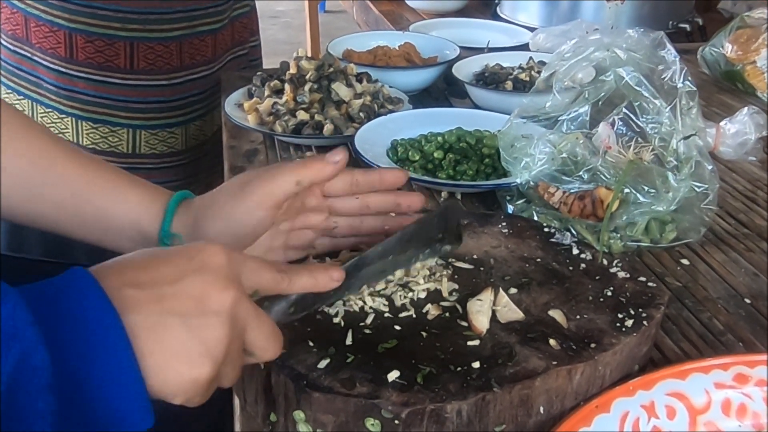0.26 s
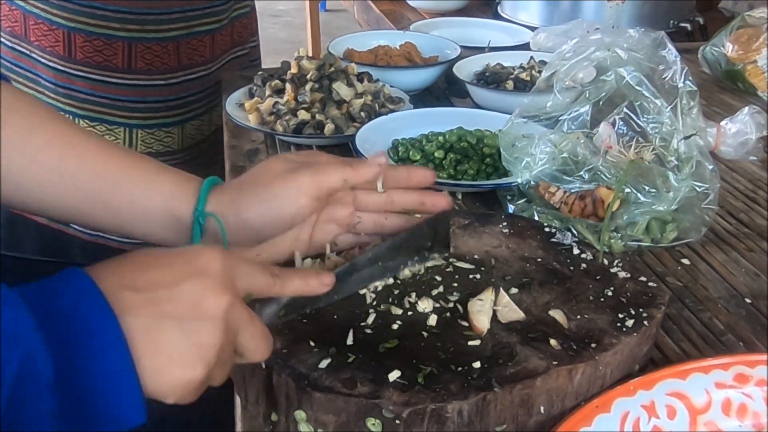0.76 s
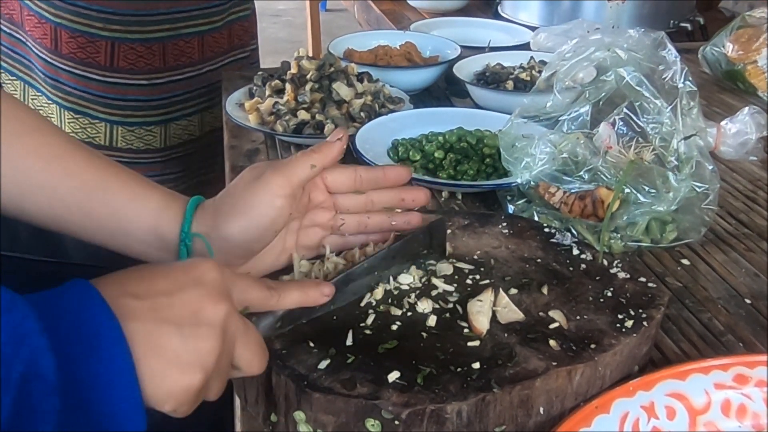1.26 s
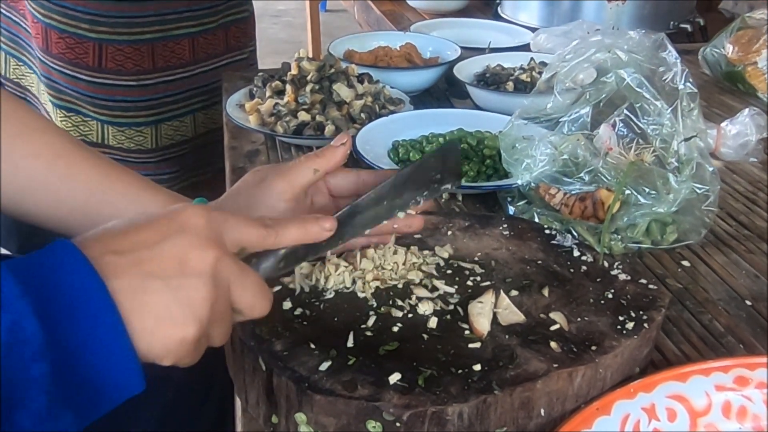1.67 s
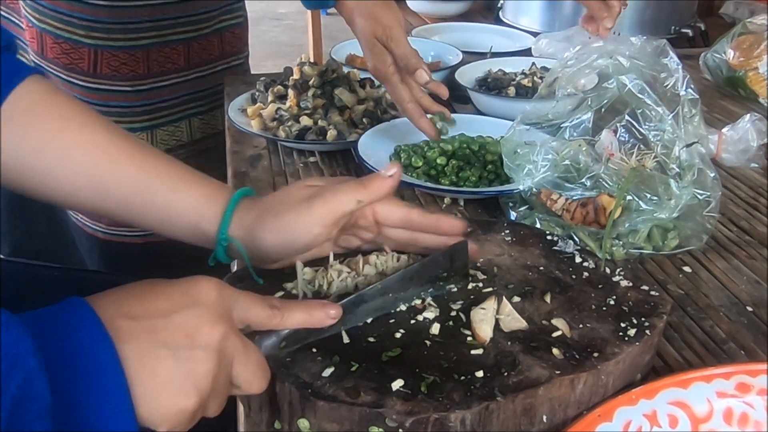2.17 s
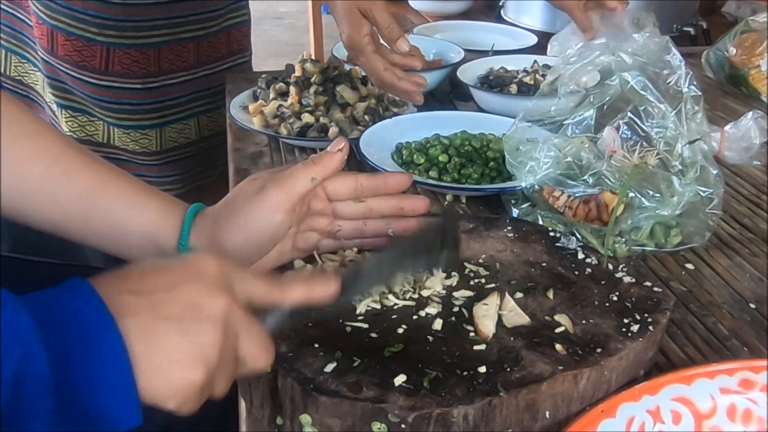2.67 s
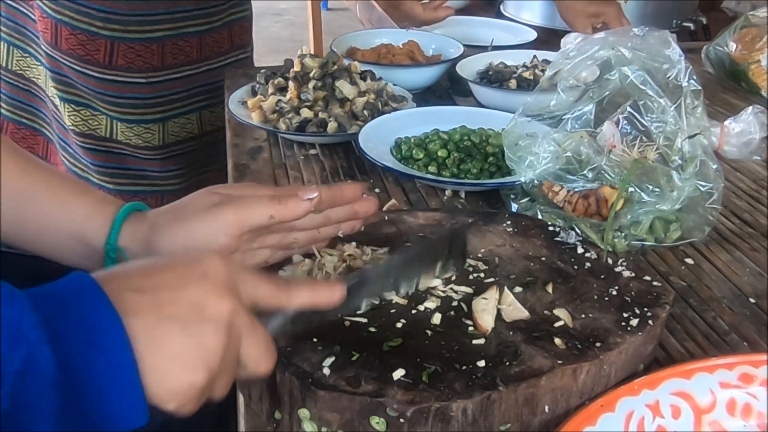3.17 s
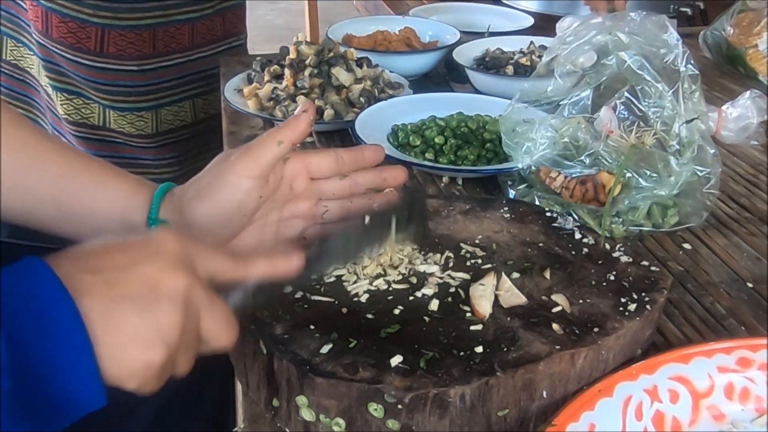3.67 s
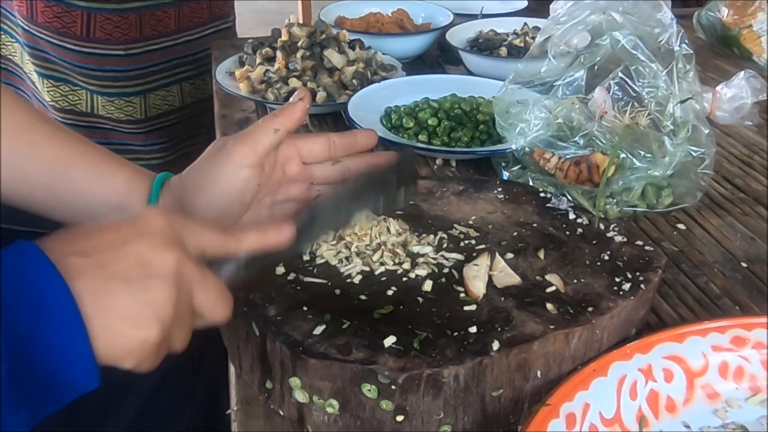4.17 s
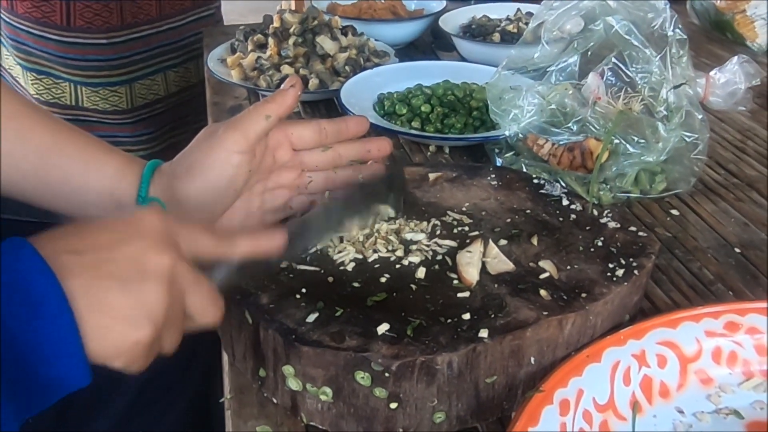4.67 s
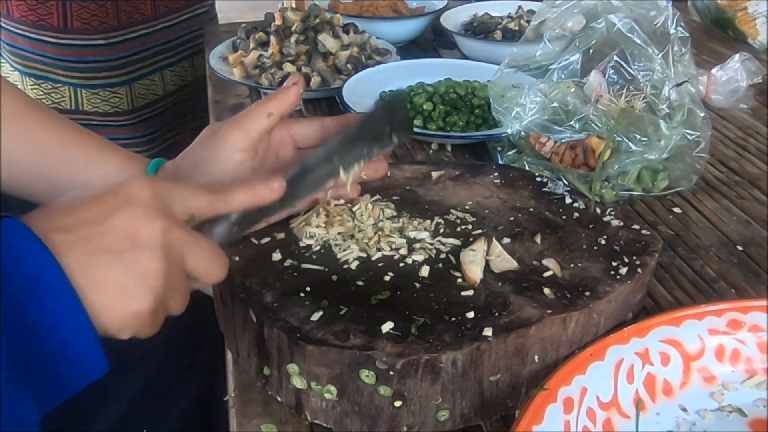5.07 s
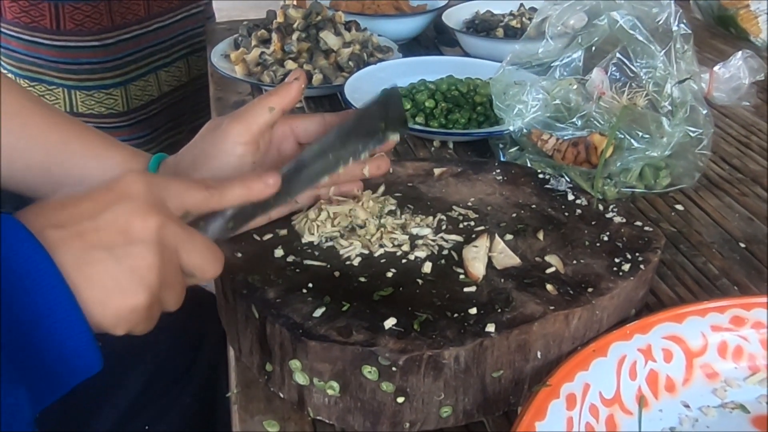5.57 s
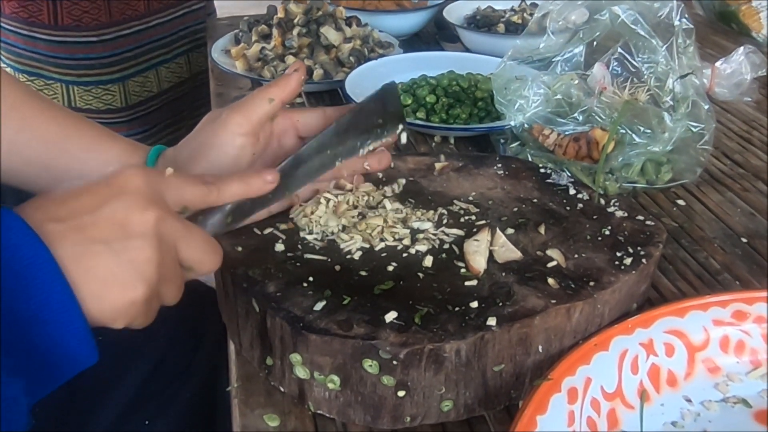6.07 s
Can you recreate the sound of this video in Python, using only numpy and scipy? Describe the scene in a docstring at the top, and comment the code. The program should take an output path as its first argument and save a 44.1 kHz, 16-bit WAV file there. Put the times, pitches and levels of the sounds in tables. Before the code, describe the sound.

Close up, a cleaver chops food on a thick wooden block. One hard blow, a long gap of soft handling, three more blows, another gap with plastic crinkling, then a steady run of about four a second. Each gives a dull thud, sharp crack and brief steel ring, echoing lightly in a hard-walled open shelter. Air puffs bump the microphone; distant birds chirp.

```python
"""Food is minced with a cleaver on a thick wooden block, about four chops a second with pauses, close by. Each
chop adds a crack and snap of the edge, a short ring of the steel and a thud of block and table. A hard-walled
shelter echoes: its response is scattered noise taps that die band by band. Plastic rustles and something
scrapes (shaped random snaps), and small birds call far off (falling tones). Low thumps of falling pitch, most
of them puffs of air on the microphone (short falling tones), sound over a low breeze, an outdoor wash and a
motor hum."""
import sys
import numpy as np
from scipy import signal
from scipy.fft import rfft, irfft, next_fast_len
from scipy.io import wavfile
from scipy.ndimage import uniform_filter1d

SR = 44100
rng = np.random.default_rng(int(sys.argv[2]) if len(sys.argv) > 2 else 0)


def generate_wav(sig):
    """Save sig (samples, or channels by samples) to the path in sys.argv[1] as 16-bit PCM at SR."""
    pcm = np.round(np.clip(np.atleast_2d(sig).T, -1, 1) * 32767).astype(np.int16)
    wavfile.write(sys.argv[1], SR, pcm)


N = 278271
TIME = np.arange(N) / SR  # seconds
FREQS = np.fft.rfftfreq(N, 1 / SR)  # Hz
RING = np.arange(int(.4 * SR)) / SR  # seconds since a blow

# All dB values in the tables are relative: each layer is also scaled where it is used.
# The chops. Each row: time in seconds, force in dB, spot along the edge from -1 (heel) to 1 (tip),
# bite (extra treble on bare wood) in dB, snap level in dB, snap centre in Hz.
CHOPS = [(0.0227, -0.5, -0.11, 2, -26, 2960), (0.29, -22, -0.23, 8.5, -51, 3920),
         (1.13, -23, 0.63, 8, -50, 3120), (1.399, -0.5, 0.023, 4.5, -30, 3560),
         (1.656, -3.5, 0.23, 1, -31, 2800), (1.9191, .5, 0.67, 1, -31, 3870),
         (2.6066, -25.5, .4, 12, -45, 3600), (2.8523, -2, 0.1, 0, -27, 4020),
         (3.1012, -1.5, 0.48, 2.5, -27.5, 3740), (3.3489, -1, 0.85, 2.5, -33.5, 3770),
         (3.6147, -6.5, 0.16, -1, -30, 2650), (3.8556, -10, -0.037, 2, -46, 3250),
         (4.108, -2, 0.1, -1.5, -26, 2920), (4.36, -3, -0.67, -0.5, -25.5, 2780),
         (4.608, -.5, -0.48, 1.5, -30, 3270), (4.852, -3, -0.33, 1, -21, 3070),
         (5.0952, 1, -.5, 1, -33, 3120), (5.3391, 1, -0.72, -1.5, -33, 2900),
         (5.5866, 0.5, -0.39, -3, -31, 2970), (5.8332, 0, -0.45, 1, -31, 3100),
         (6.0759, -17, -0.44, 4, -46, 2900)]
# The dead knock of the edge into wood. Each row: frequency in Hz, level in dB.
KNOCK = [(40, 0), (150, 3), (500, 2.5), (850, -1), (1200, -1.5), (2000, -18.5), (4000, -24), (12000, -46)]
# Ringing modes of the block, the table and the dishes on it.
# Each row: frequency in Hz, level in dB, time to die by 60 dB in seconds, rise in seconds.
BLOCK = [(144.2, -3.5, 0.25, 0.0028), (205.4, 4.5, 0.15, 0.0052), (254, -3.5, 0.052, 0.0031),
         (460, -13.5, 0.073, 0.0027), (460.5, -4.5, 0.12, 0.0099), (528.7, -4.5, 0.13, 0.0021),
         (615, -7.5, 0.069, 0.0025), (721.5, -11, 0.15, 0.0033), (940, -2, 0.02, 0.00047),
         (1078, -8, 0.1, 0.0044), (1446, -22, 0.24, 0.011), (1545, -18, 0.4, 0.016),
         (1633, -14.5, 0.42, 0.0075), (1556, -12.5, 0.23, 0.004), (1707, -8.5, 0.094, 0.0032),
         (1780, -5.5, 0.026, 0.001), (1805, -10, 0.11, 0.003), (1870, -20, 0.17, .004),
         (1997, -13, .13, 0.0026)]
# The five modes of the blade. Each entry: frequency in Hz, before the grip detunes it.
BLADE_HZ = [1710, 2610, 4205, 5420, 6900]
# The same modes, damped by hand and wood. Each row: time to die by 60 dB in seconds, rise in seconds,
# send to the room in dB, left over right in dB, phase lead of the left in radians.
BLADE = [(0.0058, 0.0023, -2.5, -0.5, -0.86), (0.046, 0.00099, -27, 2, 0.96), (0.025, 0.0024, -17, 0, 0.25),
         (0.011, 0.00091, -3.5, 7, -1.1), (0.016, 0.00024, -16, -1, -0.85)]
# How a chop drives each blade mode. Each row: level at full force in dB, spot that suits it best (-1 to 1),
# dB lost one unit from that spot (a negative loss is a gain), dB gained per dB of bite.
BLADE_DRIVE = [(-24.5, 0.95, 1.15, 0), (-28, -0.14, 27, -1.4), (-20, 0.88, 13.5, 0), (-27, 1, 0.45, -0.22),
               (-38.5, 0.2, -1, 2.5)]
GRIP = .003  # typical share by which the grip detunes the blade
# The broad crack of steel on wood. Each row: frequency in Hz, level in dB.
CRACK = [(100, -37), (900, -1.5), (1300, -14), (2200, 2.5), (3500, -3), (4800, 0.5), (6200, 0), (7500, -2),
         (9500, -6), (16000, -16)]
# Echoes of the shelter. Each row: frequency in Hz, time to die by 60 dB in seconds.
SHELTER = [(150, 0.23), (500, 0.52), (1700, 0.44), (3000, 0.41), (5400, 0.38), (9000, 0.35)]

# The free hand gathers the food. Each row: start in seconds, hold in seconds, level in dB.
GATHERS = [(0, 0.24, -53), (.45, 0.39, -55), (.75, 0.091, -53), (1.54, 0.11, -53.5), (2.15, 0.059, -56),
           (2.72, 0.12, -49.5), (3.12, 0.29, -48), (3.5, 0.41, -53)]
# Tone colour of handling the food. Each row: frequency in Hz, level in dB.
RUSTLE_COLOUR = [(500, -28), (1500, -7), (3000, -7), (5000, -4.5), (6800, 1), (9000, -6), (16000, -10.5)]
GATHER_ATTACK_S, GATHER_FADE_DB_PER_S = 0.041, 80
HANDLING_DB = -58.5  # cut food shifting under the blade all along, relative like GATHERS
# A plastic bag is moved close by. Each row: start in seconds, hold in seconds, level in dB.
BAG = [(1.675, .01, -39), (2.592, 0.071, -31.5), (2.8, 0.091, -36), (3.2, 0.13, -44.5), (3.36, 0.14, -48),
       (3.74, 0.085, -48), (6.05, .005, -44.5)]
# Tone colour of the bag. Each row: frequency in Hz, level in dB.
BAG_COLOUR = [(500, -20), (1500, -7), (3000, -3), (5000, -5), (7000, 2), (10000, 1.5), (16000, -3)]
BAG_ATTACK_S, BAG_FADE_DB_PER_S = 0.011, 143
# Something dragged nearby in two pushes. Each row: start in seconds, hold in seconds, level in dB.
SCRAPE = [(.735, 0.051, -39.5), (.82, 0.034, -34.5)]
# Tone colour of the scrape. Each row: frequency in Hz, level in dB.
SCRAPE_COLOUR = [(80, -30), (150, -2.5), (240, -1), (340, -5.5), (500, -2), (600, -7), (730, -2),
                 (1100, -15.5), (1520, -10.5), (1950, -21), (3150, -11.5), (4000, -26.5), (7000, -15.5),
                 (12000, -21), (16000, -28)]
SCRAPE_ATTACK_S, SCRAPE_FADE_DB_PER_S = .025, 172
# Small birds far off. Each row: start in seconds, length in seconds, middle pitch in Hz, level in dB.
BIRDS = [(1.233, .045, 4620, -51.5), (1.275, 0.054, 3820, -48.5), (2.253, 0.08, 6900, -59),
         (2.352, 0.047, 4440, -51), (2.383, 0.078, 3945, -51), (2.993, 0.052, 4930, -52),
         (3.875, 0.049, 4000, -49), (4.025, 0.02, 5300, -47), (4.533, 0.033, 3080, -65),
         (5.491, 0.045, 3100, -54.5), (6.125, 0.051, 4190, -57)]
CHIRP_FALL = 0.102  # share of its middle pitch by which each chirp falls

# Low thumps of falling pitch, most of them puffs of air on the microphone ports. # Each row: start in seconds,
# strength in dB, left over right in dB, starting pitch in Hz.
THUMPS = [(0.103, -25.5, -5.5, 111), (0.291, -35, 2, 260), (.863, -30, -4, 136), (1.137, -31.5, 1, 220),
          (3.376, -16, 9.5, 146), (3.427, -24, 12, 142), (3.528, -23, -6, 102), (3.565, -20.5, 5.5, 126),
          (3.827, -18, 10, 181), (3.861, -22.5, 5, 109), (3.891, -27, 14, 171), (3.989, -27.5, -16, 212),
          (4.019, -19, -8.5, 88), (4.261, -29, 8, 147), (4.345, -22, 9.5, 130), (4.53, -28.5, -4, 197),
          (4.994, -25, -16, 334), (5.011, -22, -6, 105), (6.08, -33, 0.5, 298)]
THUMP_CYCLES = 0.93  # a thump swells over about one cycle: large ones are slow and low
THUMP_LAG = .07  # cycles by which a thump reaches the quieter port later
# Strength of the breeze. Each row: time in seconds, level in dB.
BREEZE = [(0, -37), (.8, -43), (1.35, -39.5), (1.8, -47.5), (2.75, -48), (3.5, -35), (3.75, -45.5),
          (4.05, -32.5), (4.3, -43), (5.05, -39), (5.3, -42), (6.3, -41.5)]
# Tone colour of the breeze. Each row: frequency in Hz, level in dB.
BREEZE_COLOUR = [(8, -12.5), (25, 4), (60, 0.5), (110, -12.5), (200, -14.5), (320, -32), (900, -55)]
# Tone colour of the distant surroundings. Each row: frequency in Hz, level in dB.
AIR = [(59, -44), (100, -12.5), (180, 0), (246, -9.5), (342, -14), (560, -22.5), (854, -16.5), (936, -19.5),
       (2100, -21.5), (2810, -26), (6540, -25), (8000, -50), (10400, -71), (17600, -120)]
# A distant motor. Each row: middle pitch in Hz, level in dB.
HUM = [(141, -59.5), (178, -61), (856, -69.5)]
# Sound from all around. Each row: frequency in Hz, likeness of left and right (1 is identical).
SAME = [(30, 0.44), (150, 0.84), (400, 0.2), (1200, 0.034), (4000, 0.99), (8000, 0.076)]
# How well the microphone hears. Each row: frequency in Hz, gain in dB.
MICROPHONE = [(20, 2.5), (7200, -0.5), (7800, -5), (8400, -15.5), (10000, -21.5), (13000, -30.5),
              (16000, -28)]
EDGE_HZ = 15800  # upper band limit


def block(room, thud_db=-30, follow=0.89, knock_db=-3, modes_db=2, room_db=-1, side_db=2, vary_db=2.5):
    """Each chop gives a dead knock, then block, table and dishes ring, a little differently every time."""
    knock = burst(click(lambda f: read(KNOCK, f)))
    thud = amp(knock_db) * pan(side_db) * np.pad(knock, (0, len(RING) - len(knock)))
    thud = thud + amp(room_db) * convolve(knock, room)[:, :len(RING)]
    # each mode reaches the two ports at its own phase
    leads = rng.uniform(-0.17, 0.18, (len(BLOCK), 2, 1))
    modes = np.array([amp(db) * ring(hz, t60, rise, lead)
                      for (hz, db, t60, rise), lead in zip(BLOCK, leads)])
    out = np.zeros((2, N))
    for s, force_db, *_ in CHOPS:
        mode_gains = amp(vary_db * rng.standard_normal(len(BLOCK)))
        body = burst(np.tensordot(mode_gains, modes, 1)) * np.sqrt(2)
        blow = thud + amp(modes_db) * pan(side_db) * body
        add(out, s, amp(thud_db + follow * force_db) * blow)
    return out


def blade(room, direct_db=-1, chatter_db=-9, chatter_s=0.0046, size=3000):
    """The steel rings briefly, jostled as it bites and detuned by the grip; each mode also feeds the room."""
    near, sent = np.zeros((2, N)), np.zeros(N)
    for s, force_db, spot, bite_db, *_ in CHOPS:
        levels_db = [force_db + full_db - lost_db * (spot - best) ** 2 + follow * bite_db
                     for full_db, best, lost_db, follow in BLADE_DRIVE]
        bite = contact(chatter_db, chatter_s)[:1]
        for hz, (t60, rise, send_db, side_db, lead), db in zip(BLADE_HZ, BLADE, levels_db):
            detuned_hz = hz * (1 + GRIP * rng.standard_normal())
            tone = ring(detuned_hz, t60, rise, np.array([[lead], [0]]), RING[:size])
            ports = amp(db) * np.sqrt(2) * burst(convolve(tone, bite))
            add(near, s, amp(direct_db) * pan(side_db) * ports)
            add(sent, s, amp(send_db) * ports[1])
    # the blade turns in the hand and lights up other echoes
    turn = 1.26 * drift(2.5)
    return near + convolve(sent * np.cos(turn), room) + convolve(sent * np.sin(turn), shelter())


def edge(room, snap_db=0, octaves=0.27, crack_db=-30, split_db=-12, split_s=0.004, crunch_db=0,
         crunch_s=0.0034, food_db=-12, food_s=0.0023, room_db=-13, side_db=-2.0):
    """The edge crushes the food, then cracks into the wood with a narrower snap of its fibres."""
    out = np.zeros((2, N))
    crack = burst(click(lambda f: read(CRACK, f)))
    for s, force_db, _, bite_db, snap_level_db, hz in CHOPS:
        crack_level_db = crack_db + force_db + bite_db
        # the snap is a peak around its centre frequency
        snap = burst(click(lambda f: -20 * np.log10(1 + (np.log2((f + 20) / hz) / octaves) ** 2)))
        split = convolve(snap, contact(split_db, split_s))
        add(out, s + .0003, amp(snap_level_db + snap_db) * split)
        add(out, s + .0006, amp(crack_level_db) * convolve(crack, contact(crunch_db, crunch_s)))
        # the crush swells in the moment before the wood is reached: a dying noise turned backwards
        dying = rng.standard_normal((2, SR // 50)) * np.exp(-RING[:SR // 50] / food_s)
        crush = dying[:, ::-1]
        crushed = convolve(crack, crush / np.linalg.norm(crush[0]))
        add(out, s - crush.shape[1] / SR, amp(crack_level_db + food_db) * crushed)
    return pan(side_db) * out + amp(room_db) * convolve(out.mean(0), room)


def rustle(room, rustle_db=3, bag_db=-1):
    """Many tiny snaps: soft handling of food all along, and the brighter crinkle of thin plastic."""
    gathering = strokes(GATHERS, GATHER_ATTACK_S, GATHER_FADE_DB_PER_S)
    moving = np.hypot(amp(HANDLING_DB), gathering)
    handling = moving * tint(crackle(room, per_s=2300, spread_db=3.5, room_db=1.5), RUSTLE_COLOUR)
    crinkle = tint(crackle(room, per_s=2300, spread_db=6.5, room_db=7.5), BAG_COLOUR)
    bag = strokes(BAG, BAG_ATTACK_S, BAG_FADE_DB_PER_S) * crinkle
    return amp(rustle_db) * handling + amp(bag_db) * bag


def scrape(room, slips_per_s=700, direct_db=-5, room_db=-3):
    """Uneven random slips of something dragged, heard directly and through the room."""
    slips = rng.standard_normal(N) * (rng.random(N) < slips_per_s / SR)
    texture = tint(slips + 0.085 * rng.standard_normal(N), SCRAPE_COLOUR)
    sound = texture * strokes(SCRAPE, SCRAPE_ATTACK_S, SCRAPE_FADE_DB_PER_S)
    return amp(direct_db) * sound + amp(room_db) * convolve(sound, room)


def birds(room, waver=0.083):
    """Falling, wavering chirps, blurred by distance: only their echoes are heard."""
    out, wobble = np.zeros(N), drift(330)
    for s, length, middle_hz, db in BIRDS:
        count = int(length * SR)
        fall = 1 + CHIRP_FALL * np.linspace(.5, -.5, count)
        hz = middle_hz * fall * (1 + waver * wobble[int(s * SR):][:count])
        chirp = np.sin(2 * np.pi * np.cumsum(hz) / SR) * signal.windows.tukey(count, .5)
        add(out, s, amp(db) * unit(chirp))
    return convolve(out, room)


def wind(breeze_db=-1, gust_db=3, sag=.8):
    """A lumpy low rumble of noise, and thumps of falling pitch, most of them eddies hitting the ports."""
    gusts = amp(breeze_db + gust_db * np.tanh(drift(5)))
    out = gusts * level(BREEZE) * diffuse(BREEZE_COLOUR)
    for s, db, side_db, hz in THUMPS:
        age = RING * hz / THUMP_CYCLES  # 1 when the thump is fullest
        sheltered = np.array([[side_db < 0], [side_db > 0]])  # the quieter port
        turns = np.cumsum(hz / (1 + sag * age)) / SR - THUMP_LAG * sheltered
        swell = age * np.exp(1 - age)
        add(out, s, -amp(db) * pan(side_db) * np.sin(2 * np.pi * turns) * swell)
    return out


def surroundings(air_db=-52, swell_db=1, waver=0.00748):
    """Soft outdoor wash of noise and a motor hum of tones that waver in pitch and strength."""
    hum = np.zeros(N)
    for hz, db in HUM:
        turns = np.cumsum(hz * (1 + waver * drift(10.2))) / SR
        hum += amp(db) * unit(np.sin(2 * np.pi * turns) * (1 + .5 * drift(10.0)))
    return amp(air_db + swell_db * drift(4.5)) * diffuse(AIR) + hum


def shelter(onset=0.0025):
    """Stereo room response of energy 1: scattered echoes that build up, then die band by band."""
    taps = rng.standard_normal((2, SR)) * (rng.random((2, SR)) < 3000 / SR)
    hz, t, z = signal.stft(taps, SR, nperseg=256)
    decay = amp(-60 * t / read(SHELTER, hz)[:, None])
    tail = signal.istft(z * decay, SR, nperseg=256)[1][:, :len(RING)]
    tail = tail * (1 - np.exp(-(RING / onset) ** 4))
    # the room favours no broad band over another
    z = rfft(tail)
    return irfft(z / np.sqrt(uniform_filter1d(abs(z) ** 2, size=120, axis=1)))


def ring(hz, t60, rise, lead, t=RING):
    """One mode: a sine that swells and dies by 60 dB in t60 seconds."""
    return np.sin(2 * np.pi * hz * t + lead) * (1 - np.exp(-t / rise)) * np.exp(-np.log(1000) * t / t60)


def contact(crunch_db, crunch_s, size=2048):
    """One clean blow followed by a dying crunch of fibres, mostly alike at both ports; energy 1."""
    fibres = rng.standard_normal(size) + 0.43 * rng.standard_normal((2, size))
    crunch = fibres * np.exp(-RING[:size] / crunch_s)
    blow = (RING[:size] == 0) + amp(crunch_db) * crunch / np.linalg.norm(crunch[0])
    return blow / np.sqrt(np.sum(blow ** 2) / 2)


def crackle(room, per_s, spread_db, room_db):
    """Tiny snaps of very unequal size, with their echoes."""
    sizes = amp(spread_db * np.minimum(rng.exponential(1, (2, N)), 5)) * rng.standard_normal((2, N))
    snaps = sizes * (rng.random((2, N)) < per_s / SR)
    return snaps + amp(room_db) * convolve(snaps, room)


def strokes(rows, attack_s, fade_db_per_s):
    """Gain over time of gestures that rise, hold and fade; overlapping ones add in power."""
    coarse = TIME[::32]
    power = np.zeros(len(coarse))
    for s, hold, db in rows:
        age = coarse - s
        rise = np.clip(age / attack_s, 0, 1)
        fade_db = fade_db_per_s * np.maximum(age - attack_s - hold, 0)
        power += (rise * amp(db - fade_db)) ** 2
    return np.interp(TIME, coarse, np.sqrt(power))


def diffuse(colour):
    """Coloured noise from all around, partly alike at the two ports."""
    a, b = rfft(rng.standard_normal((2, N)))
    same = np.clip(read(SAME, FREQS), -1, 1)
    return tint(irfft(np.array([a, same * a + np.sqrt(1 - same ** 2) * b]), N), colour)


def drift(hz, size=64):
    """Slow chance up to about a rate in Hz, made at rms 1."""
    coarse = TIME[::size]
    smooth = np.exp(-(np.fft.rfftfreq(len(coarse), size / SR) / hz) ** 2)
    z = rfft(rng.standard_normal(len(coarse))) * smooth
    return np.interp(TIME, coarse, unit(irfft(z, len(coarse))))


def click(colour, size=2048):
    """The most compact pulse, with nothing before its start, whose spectrum in dB is colour(Hz)."""
    log_gain = np.log(amp(colour(abs(np.fft.fftfreq(size, 1 / SR)))))
    return np.fft.ifft(np.exp(np.conj(signal.hilbert(log_gain)))).real[:size // 2]


def tint(x, colour):
    """Filters a sound by a table of Hz and dB, then scales it to rms 1."""
    size = next_fast_len(N, True)
    gain = amp(read(colour, np.fft.rfftfreq(size, 1 / SR)))
    return unit(irfft(rfft(x, size) * gain, size)[..., :N])


def convolve(x, response):
    """Passes a sound through a response, channel by channel."""
    return signal.fftconvolve(np.atleast_2d(x), np.atleast_2d(response), axes=1)[:, :N]


def add(mix, s, sound):
    """Mixes a sound in at time s in seconds, cutting off what runs past the end."""
    part = mix[..., max(round(s * SR), 0):][..., :sound.shape[-1]]
    part += sound[..., :part.shape[-1]]


def pan(db):
    """Left and right gains for a level difference, left over right in dB."""
    return amp(np.array([[db], [-db]]) / 2)


def level(curve):
    """Gain at every sample from rows of seconds and dB."""
    return amp(np.interp(TIME, *np.transpose(curve)))


def read(points, hz):
    """Reads a table between its rows on a log-frequency axis."""
    f, value = np.transpose(points)
    return np.interp(np.log(hz + 1), np.log(f + 1), value)


def burst(x):
    """Scales a blow to the energy of 10 ms at rms 1."""
    return x * np.sqrt(SR / 100 / np.sum(x ** 2))


def unit(x):
    """Scales to rms 1."""
    return x / np.sqrt(np.mean(x ** 2) + 1e-20)


def amp(db):
    """Decibels to gain."""
    return 10 ** (np.asarray(db) / 20)


def scene():
    """Adds all sources: the chops share one room response, the sounds around them another."""
    room, far_room = shelter(), shelter()
    chopping = block(room) + blade(room) + edge(room)
    return chopping + rustle(far_room) + scrape(far_room) + birds(far_room) + wind() + surroundings()


def record(dry):
    """The microphone falls away steeply above about 7 kHz; then a low-pass sets the band limit."""
    heard = convolve(dry, click(lambda f: read(MICROPHONE, f)))
    low_pass = signal.firwin(511, EDGE_HZ, window=("kaiser", 9), fs=SR)
    return signal.oaconvolve(heard, low_pass[None], "same")


dry = scene()
out = record(dry)
generate_wav(out)
```